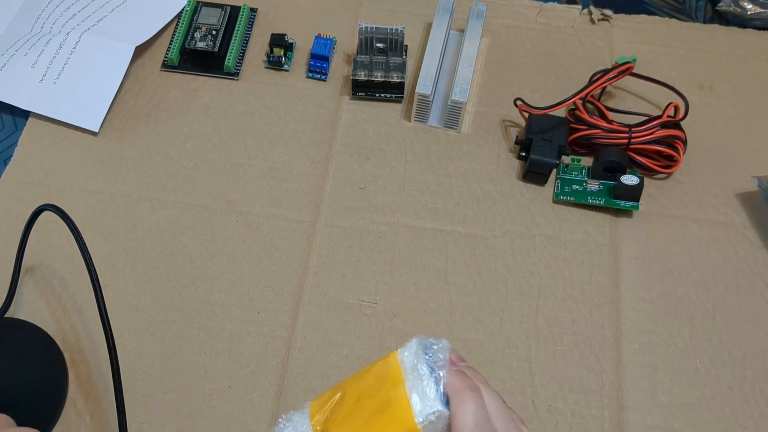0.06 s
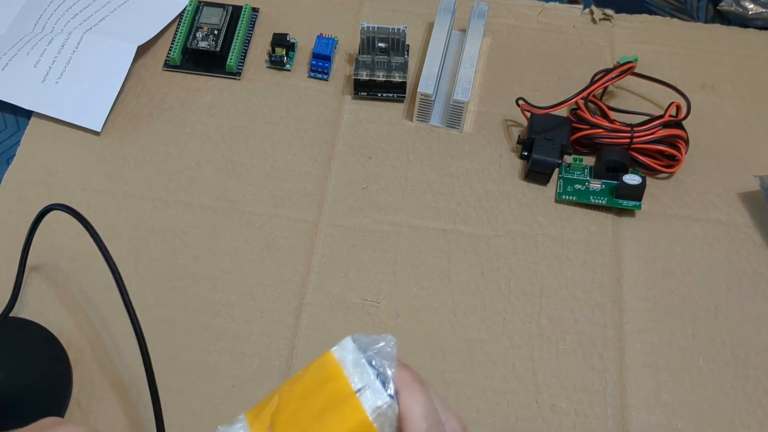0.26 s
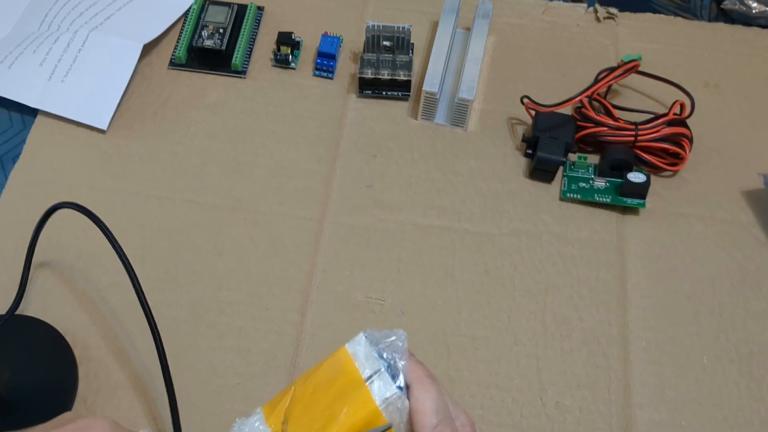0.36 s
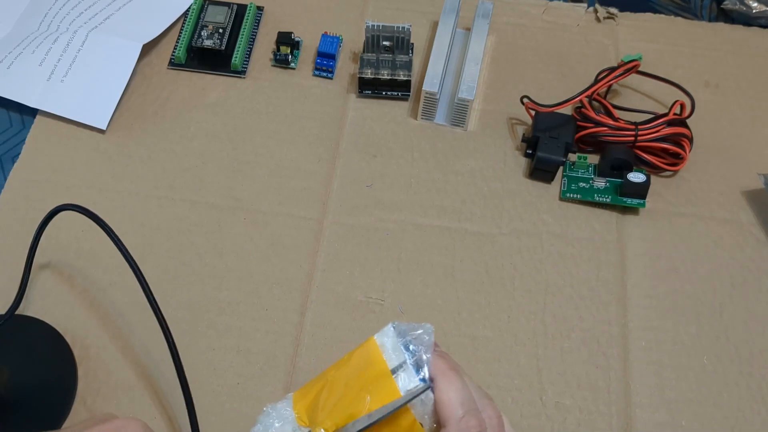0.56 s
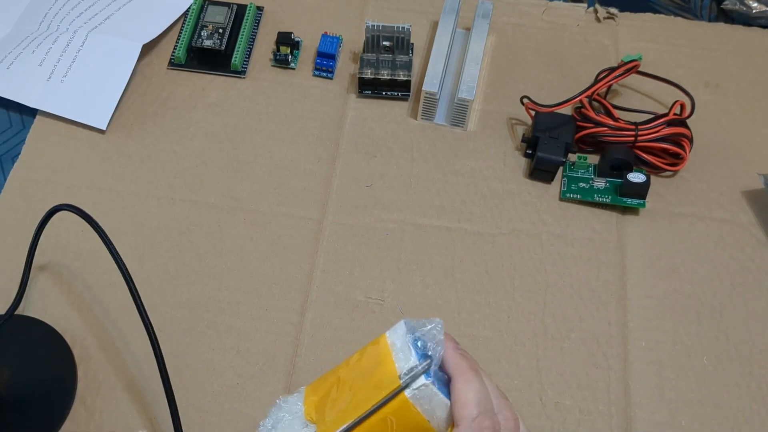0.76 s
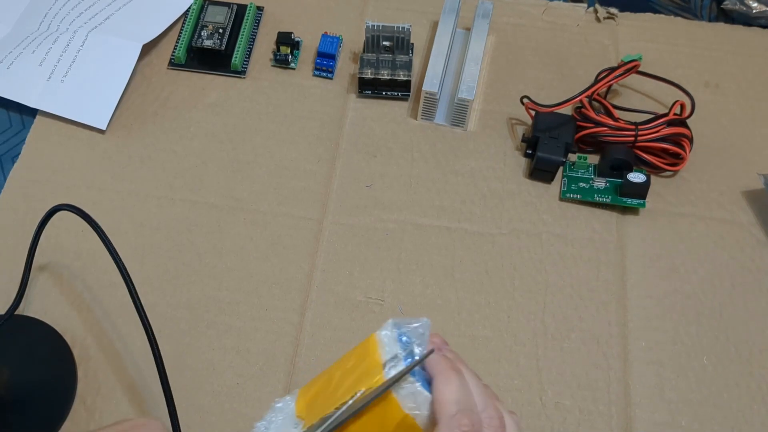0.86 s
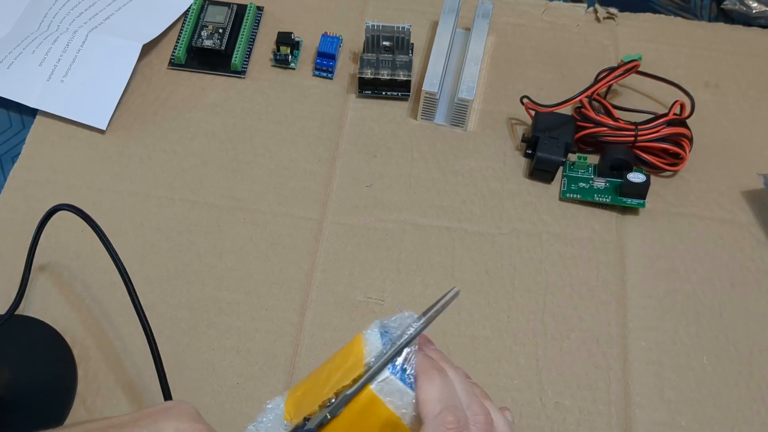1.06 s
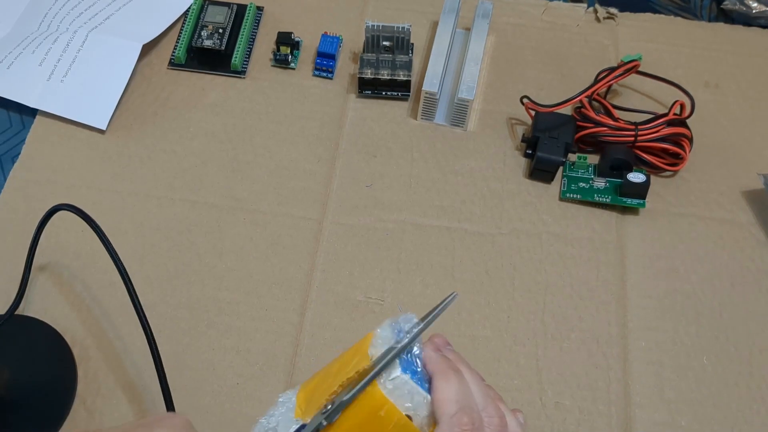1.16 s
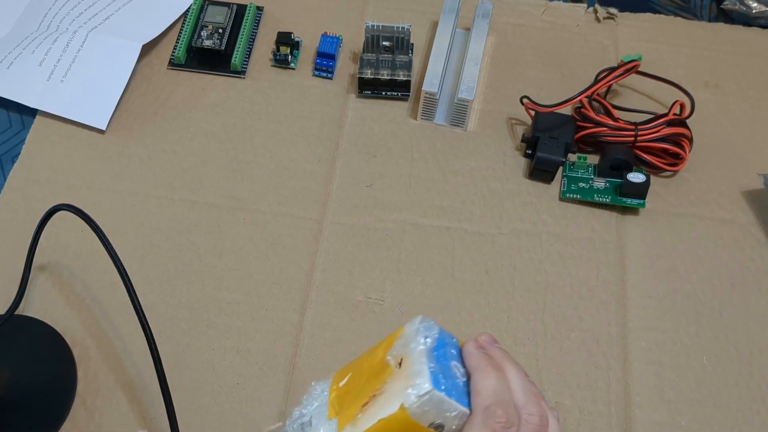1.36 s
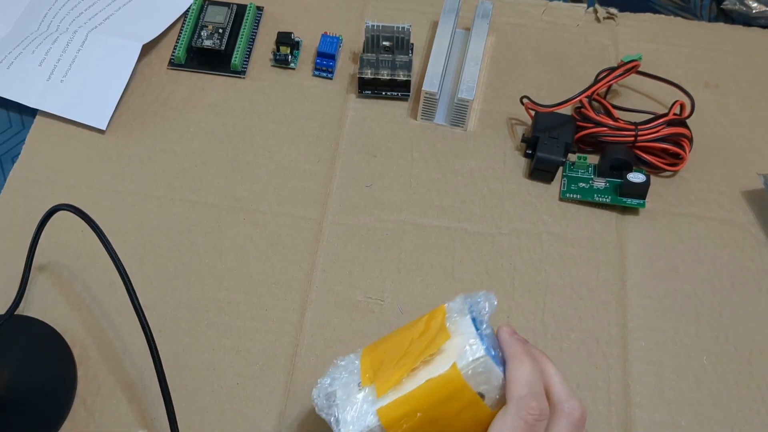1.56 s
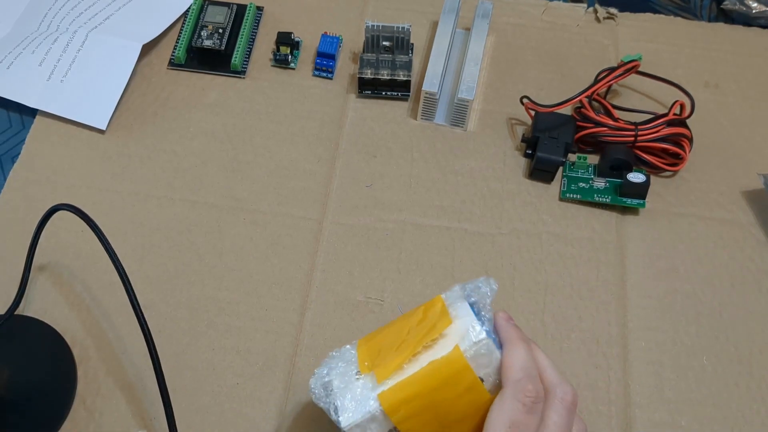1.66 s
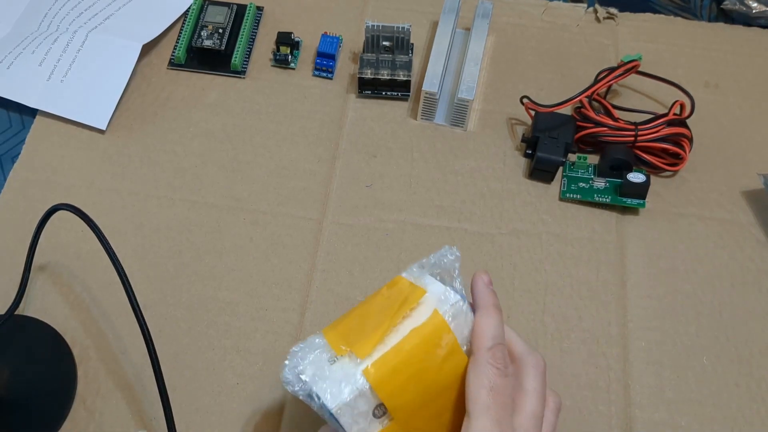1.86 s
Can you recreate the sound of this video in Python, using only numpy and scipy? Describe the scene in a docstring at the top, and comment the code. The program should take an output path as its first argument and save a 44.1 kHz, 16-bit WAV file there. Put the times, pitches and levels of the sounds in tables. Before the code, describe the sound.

Crinkly plastic wrap and stiff tape crackle sharply around a small handled box, then fade away

```python
"""Small box turned in taped bubble wrap

Hands turn a small box in taped bubble wrap above a cardboard-covered desk, close to two spaced microphones.
Thin film fizzes and tape and folds crackle lower, as random clicks ringing patches of plastic.
Single creases snap as dying runs of slips; tugs and rubs ring the modes of the box; a finger slides on taut tape.
The desk returns one bounce and rumbles faintly as filtered noise; feedback delays form a small quiet room."""
import sys
import numpy as np
from scipy import signal
from scipy.fft import rfft, irfft
from scipy.io import wavfile

SR = 44100
rng = np.random.default_rng(int(sys.argv[2]) if len(sys.argv) > 2 else 0)


def transcribe(u):
    """Save the signal u as a 16-bit wav file named by the first command-line argument.

    u: samples, shape (n,) or (channels, n), limited to [-1, 1]; the rate is SR.
    q: integer samples, one column per channel.
    """
    v = np.clip(np.atleast_2d(u).T, -1, 1)
    q = np.round(v * 32767).astype(np.int16)
    wavfile.write(sys.argv[1], SR, q)


def voltage_ratio(level):
    """Linear amplitude factor for a level in decibels (scalar or array-like)."""
    return 10 ** (np.asarray(level, float) / 20)


N = 83790   # samples, 1.9 s

# Working of the wrap. Each row: time in seconds, crackle of tape and folds in dB before a fixed trim,
# thin film over that in dB.
WORKING = [(0.0, -56.5, 5.5), (0.043, -58.5, 0), (0.088, -55, 4), (0.119, -57, 4), (0.2, -50, 1.5),
           (0.208, -29, -3), (0.248, -44, -9.5), (0.252, -35, 4.5), (0.276, -34.5, 2.5), (0.28, -34, -4),
           (0.328, -48.5, -3.5), (0.332, -34, -6), (0.354, -49, -3.5), (0.42, -54, 4.5), (0.465, -48, -1),
           (0.529, -51, -3), (0.564, -62.5, 6), (0.575, -60, -5), (0.587, -39, 1.5), (0.618, -61.5, -2),
           (0.638, -44.5, -6.5), (0.683, -58, 6), (0.697, -53, -1), (0.726, -44, 5), (0.747, -56, -0.5),
           (0.823, -57, 0), (0.838, -56, -4), (0.854, -48, 7), (0.87, -43.5, 2.5), (0.907, -52.5, -3.5),
           (0.928, -51.5, 4.5), (0.946, -44, 1.5), (0.985, -58, 9.5), (1.003, -47, 1), (1.034, -55, 2),
           (1.048, -42.5, -2), (1.079, -46, 6.5), (1.101, -55, 6), (1.203, -57, 3), (1.262, -54, 7.5),
           (1.292, -46, 5.5), (1.35, -49, -0.5), (1.364, -42.5, 8.5), (1.439, -53.5, -17),
           (1.486, -59.5, 4.5), (1.55, -63.5, -2.5), (1.637, -71, 7), (1.662, -65, -11),
           (1.676, -65.5, 18.5), (1.733, -60, -7), (1.828, -67, 5), (1.863, -96, 2), (1.9, -59, -21)]
# Where the box is held. Each row: time in seconds, lead of the left side in ms, left over right in dB.
PLACE = [(0, .11, 2.5), (.5, 0.1, 1.1), (1.1, 0.083, 2), (1.4, 0.046, .3), (1.9, 0.0034, 3)]


def rms_one(x):
    """Normalisation: divide by the root mean square, so that a level in dB can be applied."""
    return x / np.sqrt(np.mean(x ** 2) + 1e-20)


def in_time(rows, s=None):
    """Linear interpolation of each table column at given times, or at every sample."""
    t, *columns = np.transpose(rows)
    when = np.arange(N) / SR if s is None else s
    return [np.interp(when, t, column) for column in columns]


def at_hz(points, hz):
    """Spectral envelope: levels in dB interpolated along a logarithmic frequency axis."""
    point_hz, point_db = np.transpose(points)
    return np.interp(np.log(hz), np.log(point_hz), point_db)


def ring(clicks, hz, t60):
    """Damped resonance: a unit click starts a sine of height 1 that decays by 60 dB in t60 seconds."""
    radius = voltage_ratio(-60 / (t60 * SR))
    turn = 2 * np.pi * hz / SR
    poles = [1, -2 * radius * np.cos(turn), radius ** 2]
    return signal.lfilter([0, np.sin(turn)], poles, clicks + 1e-18)


def arrive(s, size, lead_ms, pan_db):
    """Stereo cues: clicks reach two microphones with differences of time and level."""
    out = np.zeros((2, N))
    for side, sign in enumerate((1, -1)):
        arrival_s = s - sign * lead_ms / 2000
        at = np.clip(np.round(arrival_s * SR).astype(int), 0, N - 1)
        np.add.at(out[side], at, size * voltage_ratio(sign * pan_db / 2))
    return out


def noise(spectrum, alike):
    """Partial coherence: mid and side noise are mixed to a set correlation, then coloured; rms 1."""
    mid, side = rng.standard_normal((2, N))
    pair = np.sqrt(1 + alike) * mid + np.sqrt(1 - alike) * side * np.array([[1], [-1]])
    hz = np.maximum(np.arange(N // 2 + 1) * SR / N, 1)
    return rms_one(irfft(rfft(pair) * voltage_ratio(at_hz(spectrum, hz)), N))


def patches(spectrum, count):
    """Modal sampling: log-spaced patch pitches, with strengths that allow for their growing bandwidth."""
    hz = np.geomspace(spectrum[0][0], min(spectrum[-1][0], 16000), count)
    return hz, voltage_ratio(at_hz(spectrum, hz)) * np.sqrt(hz / hz[0])


def crackle(spectrum, grains_per_s, cycles, tilt_db):
    """Buckling as clumped random impulses, each ringing one patch from its own spot; rms 1 without tilt."""
    clumps_per_s, clump_db, clump_fade_s, spread_db = 70, 1.8, 0.005, 1.5
    width_ms = 0.074   # scatter of arrival difference over the parcel

    # each clump starts sharply and fades
    starts = (rng.random(N) < clumps_per_s / SR) * np.minimum(rng.exponential(1, N), 3)
    swell = signal.lfilter([1], [1, -np.exp(-1 / (clump_fade_s * SR))], starts)
    sizes = voltage_ratio(spread_db * np.minimum(rng.exponential(1, N), 5)) * rng.choice([-1, 1], N)
    sizes = sizes * voltage_ratio(clump_db * swell)

    born = rng.random(N) < grains_per_s / SR
    patch = rng.integers(0, 16, N)
    spot = rng.standard_normal((2, N))
    lead_ms, pan_db = in_time(PLACE)
    pitches, gains = patches(spectrum, count=16)
    rings = []
    for k, (hz, gain) in enumerate(zip(pitches, gains)):
        i = np.flatnonzero(born & (patch == k))
        clicks = arrive(i / SR, sizes[i], lead_ms[i] + width_ms * spot[0, i], pan_db[i] + 3 * spot[1, i])
        rings.append(ring(clicks * gain * np.sqrt(hz), hz, cycles / hz))
    tilted = sum(r * voltage_ratio(tilt_db * np.log2(hz / pitches[8])) for r, hz in zip(rings, pitches))
    return tilted / np.std(sum(rings))


def snaps(rows, cycles, step_octaves, offset_db):
    """Stick-slip: six weakening slips per crease ring five patches, neighbours in opposite sense."""
    delay_s, loss_db_per_slip, loss_db_per_step, scatter_db = 0.0008, 4, 6, 1.5
    # axes: crease, slip, patch
    s, db, pitch_hz, length_ms = np.transpose(rows)[:, :, None, None]
    luck = rng.standard_normal((len(rows), 6, 7))
    step = np.arange(-2, 3)
    slip = np.arange(6)[:, None]
    hz = np.clip(pitch_hz * 2 ** (step * step_octaves), 300, 16200)
    late_s = np.abs(length_ms) / 5000 * slip * (1 + .2 * luck[:, :, 5:6])

    size_db = db + offset_db - loss_db_per_slip * slip - loss_db_per_step * np.abs(step)
    size = voltage_ratio(size_db + scatter_db * luck[:, :, :5])
    size = size * np.sign(luck[:, :, 6:]) * (-1.) ** step

    lead_ms, pan_db = in_time(PLACE, s)
    out, n = np.zeros((2, N + 999)), np.arange(700)
    first = (s[:, 0] * SR).astype(int)
    for side, sign in enumerate((1, -1)):
        arrival_s = s + delay_s + late_s - sign * lead_ms / 2000
        age_s = (first[:, None, None] + n) / SR - arrival_s[..., None]
        age = np.maximum(age_s, 0) * hz[..., None]   # in cycles
        decay = voltage_ratio(-60 * age / cycles)
        rings = (size * voltage_ratio(sign * pan_db / 2))[..., None] * np.sin(2 * np.pi * age) * decay
        np.add.at(out[side], first + n, rings.sum(axis=(1, 2)))
    return out[:, :N]


def film():
    """Radiation from thin film: dense high-pitched buckling and ticking creases, with no low end."""
    # Colour of the film. Each row: frequency in Hz, relative level in dB per Hz.
    film_spectrum = [(5000, 0), (6070, -31), (7200, 11.5), (8020, -3), (9000, 10), (11800, 15.5),
                     (13800, 6), (16000, 2)]
    # Ticking creases. Each row: time in seconds, relative strength in dB, pitch in Hz,
    # nominal span of the slips in ms.
    film_creases = [(0.0064, -43, 9910, 0.76), (0.054, -22.5, 8900, 0.33), (0.0694, -38, 11900, 0.89),
                    (0.0918, -28, 7200, 1.9), (0.129, -24, 8630, 1.01), (0.202, -7, 6500, 0.3),
                    (0.2021, -7, 13000, 0.47), (0.2504, -16, 11400, 1.3), (0.3296, -34, 10900, 1.3),
                    (0.3687, -20, 10000, 1.06), (0.394, -29, 11600, 0.98), (0.406, -39, 11300, 0.95),
                    (0.5437, -21, 11800, 0.4), (0.5837, -14.5, 8100, 0.8), (0.5838, -15, 14500, 0.73),
                    (0.5875, -23, 10100, 0.74), (0.5904, -34, 9140, 1.7), (0.63, -24, 9900, 1.5),
                    (0.67, -38, 10600, 1), (0.6946, -23, 11100, 1.5), (0.7154, -45, 10300, 1.1),
                    (0.7257, -34, 11100, 1.8), (0.7624, -32, 9800, 1.3), (0.7678, -30, 6900, 1.04),
                    (0.7814, -47, 9590, 1.3), (0.848, -31, 11700, 1.3), (0.854, -39, 11500, 0.91),
                    (0.8722, -17, 12000, 1), (0.91, -35, 10600, 1.3), (0.9408, -22, 11200, 1.7),
                    (1.044, -24.5, 11500, 1.9), (1.0728, -15, 12200, 1.8), (1.0772, -18, 12100, 5),
                    (1.0832, -30, 11500, 3.5), (1.1106, -22, 12900, 0.91), (1.1142, -27, 9500, 0.68),
                    (1.1593, -27, 12100, 1.3), (1.171, -28, 13500, 0.69), (1.2153, -48, 11100, 0.85),
                    (1.262, -25, 11700, 3), (1.3025, -28, 10500, 0.85), (1.3588, -14, 11400, 1.2),
                    (1.513, -28, 10700, 1), (1.6676, -24, 11400, 1.3), (1.8454, -40, 6800, 1),
                    (1.8692, -44, 9100, 1.6)]
    fold_db, over_db = in_time(WORKING)
    fizz = crackle(film_spectrum, grains_per_s=22000, cycles=30, tilt_db=0)
    ticks = snaps(film_creases, cycles=11.25, step_octaves=0.35, offset_db=1)
    high_pass = signal.butter(2, 5360, "high", fs=SR, output="sos")
    return signal.sosfilt(high_pass, voltage_ratio(fold_db + over_db - 0.17) * fizz + ticks)


def folds():
    """Buckling of stiff tape and folds: lower grains, ringing for fewer cycles and tilted, and lower snaps."""
    # Colour of the folds. Each row: frequency in Hz, relative level in dB per Hz.
    fold_spectrum = [(530, -34), (900, -25.5), (2240, -4), (2390, -0.5), (3260, -1.5), (4690, 2),
                     (5450, -6), (5900, -11.5), (6860, 3.5), (7500, -12.5), (9750, -33), (16500, -120)]
    # Which folds are worked, broad tape or tight creases. Each row: time in seconds, tilt in dB per octave.
    tightness = [(0, 2.5), (.2, -4), (.35, -4), (.5, 3), (.65, 0.8), (.85, -4), (1.05, -8), (1.25, -1),
                 (1.45, -7.5), (1.9, 1)]
    # Stiff folds of tape that snap. Each row: time in seconds, relative strength in dB, pitch in Hz,
    # nominal span of the slips in ms.
    fold_creases = [(0.0541, -30.5, 3500, 0.46), (0.155, -30, 2700, 4.2), (0.202, -4.5, 2700, 0.74),
                    (0.21, -6.5, 2500, 2.52), (0.2485, -41, 2450, 2.9), (0.285, -10.5, 1890, 1.08),
                    (0.3309, -18, 2040, 3.65), (0.4574, -26, 2440, 0.93), (0.4935, -27.5, 2660, 2.7),
                    (0.5835, -16.5, 2520, 1.15), (0.5861, -29, 1720, 1.2), (0.5898, -41, 2730, 0.74),
                    (0.63, -34, 1730, 1.22), (0.6944, -30, 2370, 1.4), (0.6978, -29.5, 2040, 1.3),
                    (0.7223, -28, 1970, 1.86), (0.7257, -25, 3500, 3.9), (0.7815, -32, 1710, 2.3),
                    (0.8232, -30, 3800, 1), (0.8367, -47, 2150, 1.3), (0.85, -43, 2620, 2),
                    (0.8729, -29.5, 1004, 3), (0.941, -20, 2570, 1.9), (0.9981, -30.5, 1770, 0.99),
                    (1.0435, -20.5, 3460, 1.19), (1.061, -32, 1630, 1.8), (1.0725, -32, 2500, 1.5),
                    (1.083, -18, 3930, 1.8), (1.292, -25, 3100, 0.51), (1.3568, -20, 1655, 0.56),
                    (1.3588, -17.5, 2340, 2.09), (1.4085, -23, 3600, 1.56), (1.5132, -35, 3450, 1.97),
                    (1.699, -45.5, 1500, 2.6), (1.7137, -42, 2070, 1.04), (1.773, -48.5, 1440, 1.7),
                    (1.8304, -37.5, 3680, 1.34), (1.846, -52, 4740, 0.78)]
    fold_db = in_time(WORKING)[0]
    grains = crackle(fold_spectrum, grains_per_s=9000, cycles=9.4, tilt_db=in_time(tightness)[0])
    cracks = snaps(fold_creases, cycles=12.2, step_octaves=0.38, offset_db=-5.5)
    return voltage_ratio(fold_db + 1.5) * grains + cracks


def box():
    """Modal synthesis: softened knocks and a random stream of small rubs excite the modes of the box."""
    # Tugs that knock the box. Each row: time in seconds, relative strength in dB.
    knocks = [(0.201, -17.5), (0.235, -20.5), (0.248, -30.5), (0.328, -33.5), (0.582, -40.5), (0.72, -38.5),
              (0.779, -45), (0.861, -29.5), (0.876, -38), (0.885, -41), (0.943, -36), (0.994, -39),
              (1.0432, -23.5), (1.278, -41), (1.292, -35), (1.355, -28.5), (1.409, -38)]
    # Grip of the wrap rubbing on the box. Each row: time in seconds, relative level in dB.
    grip = [(0.0, -63), (0.165, -70), (0.2, -81), (0.21, -34), (0.235, -36), (0.312, -52), (0.345, -50),
            (0.421, -56), (0.565, -62.5), (0.593, -47.5), (0.622, -56), (0.722, -56.5), (0.821, -74),
            (0.876, -32.5), (0.895, -52.5), (0.981, -54), (1.057, -38.5), (1.11, -54.5), (1.231, -60.5),
            (1.289, -47.5), (1.329, -54), (1.37, -44), (1.572, -64.5), (1.9, -69)]
    # Modes of the box. Each row: frequency in Hz, relative level in dB, decay time t60 in seconds.
    modes = [(200, -18, 0.075), (337.8, -2, 0.038), (426, 4, 0.032), (505.5, -3, 0.022), (587, -1, 0.051),
             (675, -4.5, 0.081), (770, -1.5, 0.025), (1043, -40, 0.025)]
    rubs_per_s, rub_db, rub_apart = 570, -7, 0.5   # rub_apart: spread between the sides
    knock_db, knock_late_s, knock_scatter_db, knock_soft_hz = -15, 0.001798, 2.0, 1430

    s, db = np.transpose(knocks)
    luck_db = rng.normal(0, knock_scatter_db, (len(s), len(modes)))
    rubs = (rng.random(N) < rubs_per_s / SR) * rng.laplace(0, 1, (len(modes), 1, N))
    rubs = rubs * (1 + rub_apart * rng.standard_normal((len(modes), 2, N)))
    lead_ms, pan_db = in_time(PLACE, s)
    knocked = rubbed = 0
    for k, (hz, level_db, t60) in enumerate(modes):
        size = voltage_ratio(db + knock_db + level_db + luck_db[:, k])
        knocked = knocked + ring(arrive(s + knock_late_s, size, lead_ms, pan_db), hz, t60)
        rubbed = rubbed + ring(rubs[k] * voltage_ratio(level_db), hz, t60)
    lean_db = in_time(PLACE)[1] * np.array([[.5], [-.5]])
    rubbed = rms_one(rubbed) * voltage_ratio(rub_db + in_time(grip)[0] + lean_db)
    soften = signal.butter(2, knock_soft_hz, fs=SR, output="sos")
    return signal.sosfilt(soften, knocked) + rubbed


def bounce(parcel):
    """Specular reflection: the desk returns one delayed, weaker copy to each microphone."""
    delays_ms = (0.563, 0.78)   # left and right
    n = np.arange(N)
    delayed = [np.interp(n - ms * SR / 1000, n, side) for ms, side in zip(delays_ms, parcel)]
    return voltage_ratio(-15.5) * np.array(delayed)


def room(x):
    """Reverberation by recirculation: six feedback delays a side, duller on every round."""
    t60_s, wall_cut_hz = 0.36, 18000
    dull = np.exp(-2 * np.pi * wall_cut_hz / SR)
    out = np.zeros((2, N))
    lags = (rng.uniform(.008, 0.032, 12) * SR).astype(int)
    for k, lag in enumerate(lags):
        loop, state = x.copy(), [0.]
        gain = voltage_ratio(-60 * lag / SR / t60_s)
        for i in range(lag, N, lag):
            back, state = signal.lfilter([gain * (1 - dull)], [1, -dull], loop[i - lag:i], zi=state)
            loop[i:i + lag] += back[:N - i]
        out[k % 2] += (loop - x) * (-1) ** (k // 2)
    return voltage_ratio(-16.5) * out


def rumble():
    """Structure-borne sound: hands and arms rumble through the desk as low-coloured noise."""
    # Strength of the rumble. Each row: time in seconds, level in dB.
    rumble_level = [(0, -57.5), (.18, -65.5), (.25, -54.5), (.285, -47), (.32, -51.5), (.36, -49.5),
                    (.43, -58.5), (.49, -71), (.6, -62), (.66, -71.5), (1.0, -71), (1.4, -71.5),
                    (1.55, -78.5), (1.78, -80), (1.9, -68.5)]
    # Colour of the desk. Each row: frequency in Hz, relative level in dB per Hz.
    desk_spectrum = [(12, -44), (20, -27), (37, 7), (53, 6.5), (150, 11.5), (184, -4.5), (220, -3.5),
                     (290, -27), (480, -120)]
    return voltage_ratio(in_time(rumble_level)[0]) * noise(desk_spectrum, alike=0.15)


def still_air():
    """Stationary background: steady coloured noise, nearly independent at the two microphones."""
    # Colour of the still air. Each row: frequency in Hz, relative level in dB per Hz.
    air_spectrum = [(24, -35), (40, -4), (290, 9), (491, -20), (556, 1), (1020, -1), (3560, 3), (5720, -3),
                    (10400, 2), (16000, -3)]
    return voltage_ratio(-61.5) * noise(air_spectrum, alike=0.046)


def slide():
    """Friction-driven resonance: a finger's fine steady noise excites broad modes of the taut tape."""
    # Strength of the slide. Each row: time in seconds, level in dB.
    slide_level = [(0, -93), (.41, -57.5), (.455, -53), (.49, -49.5), (.535, -46.5), (.56, -66), (1.9, -99)]
    # Resonances of the tape. Each row: frequency in Hz, relative level in dB, decay time t60 in seconds.
    tape_modes = [(1640, -7, 0.027), (2450, 2, 0.019), (3200, 4, 0.009)]
    friction = rng.standard_normal((2, N)) + rng.standard_normal(N)   # own and shared parts
    rings = sum(ring(friction * voltage_ratio(level_db), hz, t60) for hz, level_db, t60 in tape_modes)
    return voltage_ratio(in_time(slide_level)[0]) * rms_one(rings)


def scene():
    """Superposition: the parcel, its bounce off the desk, the room, rumble and still air add up."""
    parcel = film() + folds() + box() + slide()
    # the parcel is too small to radiate the lowest pitches
    radiates = signal.butter(4, 218.5, "high", fs=SR, output="sos")
    parcel = signal.sosfilt(radiates, parcel)
    return parcel + bounce(parcel) + room(parcel.mean(axis=0)) + rumble() + still_air()


def top_cut(x):
    """Nothing passes above the cut-off."""
    return signal.sosfilt(signal.butter(12, 16970, fs=SR, output="sos"), x)


def record(dry):
    """Band limitation: the microphones lose the deepest bass; a steep low-pass near 16 kHz ends the band."""
    low = signal.butter(2, 42, "high", fs=SR, output="sos")
    high = signal.cheby2(14, 30, 16250, fs=SR, output="sos")
    mix = signal.sosfilt(np.vstack([low, high]), dry)
    return top_cut(mix)


dry = scene()
out = record(dry)
transcribe(out)
```